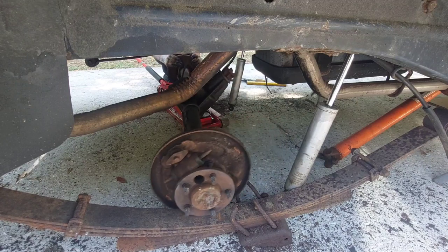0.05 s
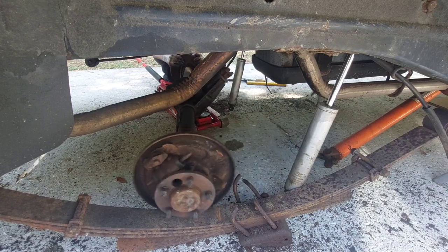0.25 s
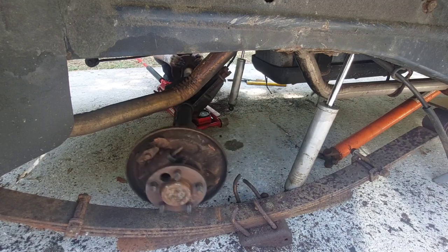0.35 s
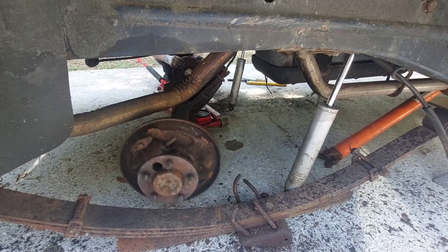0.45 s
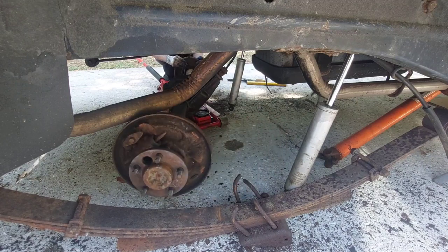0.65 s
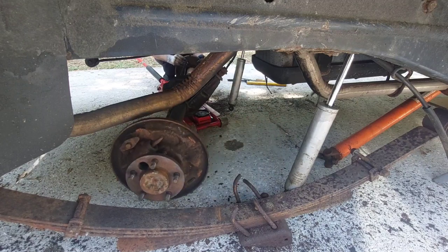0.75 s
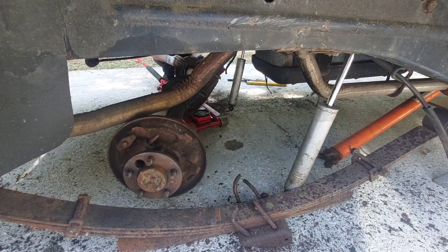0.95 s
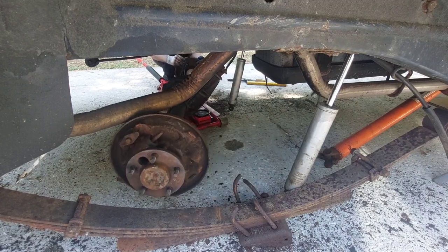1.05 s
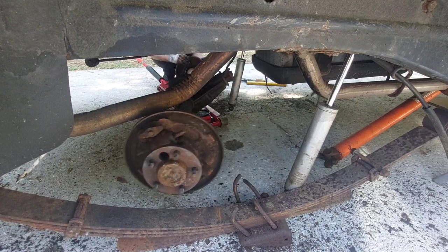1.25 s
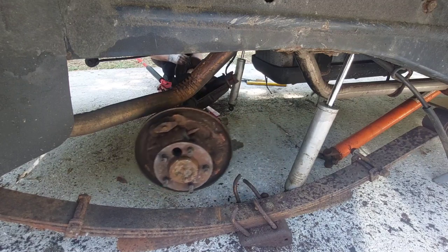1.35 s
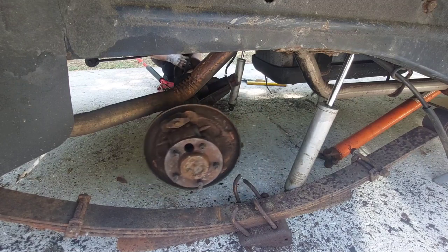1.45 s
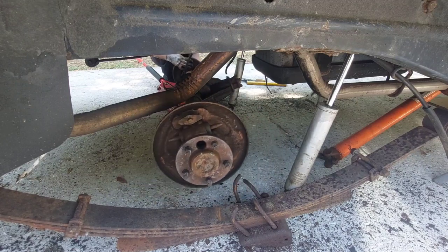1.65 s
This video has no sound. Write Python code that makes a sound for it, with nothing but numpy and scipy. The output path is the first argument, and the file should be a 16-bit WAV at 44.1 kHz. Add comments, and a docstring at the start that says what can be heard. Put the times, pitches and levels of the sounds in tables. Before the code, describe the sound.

Loose steel parts clank and rattle as a heavy axle is jolted across a concrete floor

```python
"""Slack steel parts clank as a heavy axle is shoved about on a floor jack under a car: modal blows with rebounds.
The jack's wheels grind over concrete, and shaped noise and jolts excite the axle's low body tones.
Grit scuffs as decaying puffs of coloured noise; dragged grit and light taps ring the brake drum's modes.
The clanks and scuffs reverberate in the garage, over a steady hum of shaped noise."""
import sys
import numpy as np
from scipy import signal
from scipy.fft import rfft, irfft, next_fast_len
from scipy.io import wavfile
from scipy.ndimage import uniform_filter1d

SR = 44100
rng = np.random.default_rng(int(sys.argv[2]) if len(sys.argv) > 2 else 0)


def wrap_up_sound(samples):
    """Save the sound to the file named by the first command line argument, as 16-bit audio."""
    columns = np.atleast_2d(samples).T
    # keep every value between -1 and 1, then stretch to whole-number steps
    tamed = np.clip(columns, -1, 1)
    steps = np.round(tamed * 32767).astype(np.int16)
    wavfile.write(sys.argv[1], SR, steps)


N = 74970  # length in samples

# Likeness of the two channels. Each row: frequency in Hz, left-right correlation (1 is identical).
LIKENESS = [(100, 1), (250, 0.91), (500, 0.61), (1200, -0.13), (4000, -0.032), (14000, -0.14)]
# Spectrum of slack steel's crack and weak modes. Each row: frequency in Hz, relative level in dB.
CLATTER_SPECTRUM = [(290, -42), (500, -8), (1350, -15.5), (1960, -2.5), (2130, -8), (2610, 3), (2930, -9.5),
                    (4980, -7.5), (6270, -17), (15500, -66.5)]


def amp(db):
    """The decibel is logarithmic: 20 dB is a factor of ten in amplitude."""
    return 10 ** (np.asarray(db) / 20)


def unit(x):
    """Normalization to an rms of 1."""
    return x / np.sqrt(np.mean(x ** 2) + 1e-20)


def along(points, hz):
    """Interpolation of (Hz, value) points along a logarithmic frequency axis."""
    f, v = np.transpose(points)
    return np.interp(np.log(hz + 1), np.log(f + 1), v)


def filtered(x, response):
    """Linear filtering: the spectrum of x times a complex frequency response."""
    m = next_fast_len(N + SR // 2)  # zero padding leaves room for the tail
    spectrum = rfft(x, m) * response(np.fft.rfftfreq(m, 1 / SR))
    return irfft(spectrum, m)[..., :N]


def rush(gain, grain_db=0):
    """Shaped stereo noise of rms 1: mid and side shares set its correlation, amplitude modulation its grit."""
    grain = amp(grain_db * unit(uniform_filter1d(rng.standard_normal(N), size=40)))
    noise = grain * rng.standard_normal((2, N))

    def mid_side_gain(hz):
        turn = np.arccos(np.clip(along(LIKENESS, hz), -1, 1)) / 2
        return gain(hz) * [np.cos(turn), np.sin(turn)]

    mid, side = filtered(noise, mid_side_gain)
    return unit(np.array([mid + side, mid - side]))


def swell(s, rise, t60):
    """Envelope of a damped source: exponential approach from time s, times a decay of 60 dB per t60."""
    t = np.maximum(np.arange(N) / SR - s, 0)
    return (1 - np.exp(-t / abs(rise))) * amp(-60 * t / abs(t60))


def waver(db, size, count=1):
    """Slow amplitude modulation: smoothed random gains, db in rms, drifting over about size samples."""
    drift = uniform_filter1d(rng.standard_normal((count, N)), size=size)
    drift = uniform_filter1d(drift, size=size)
    return amp(db * unit(drift))


def ports(modes):
    """Interchannel phase: each mode's phases lie further apart where the channels are less alike."""
    gap = np.arccos(np.clip(along(LIKENESS, np.transpose(modes)[0]), -1, 1))
    signed_gap = gap * rng.choice([-1, 1], size=len(gap))
    return np.outer(signed_gap, [.5, -.5]) + 2 * np.pi * rng.random((len(gap), 1))


def ring(modes, phases, rise, scale=1, tilt_db=0, length_s=0.3, scatter_db=3.0):
    """Modal superposition: one blow starts damped sines, with randomly scattered levels, in both channels."""
    hz, db, t60 = np.transpose(modes)[:, :, None]
    t = np.arange(round(length_s * SR)) / SR
    tilt = tilt_db * np.log2(hz / 3000)  # tilt in dB per octave about 3 kHz
    size = amp(db + tilt + scatter_db * rng.standard_normal(hz.shape))
    waves = np.exp(2j * np.pi * hz * t - np.log(1000) * t / abs(t60 * scale))
    onset = 1 - np.exp(-t / abs(rise))
    return onset * ((size * np.exp(1j * phases)).T @ waves).imag


def add(out, s, x):
    """Superposition: x is summed into out from time s."""
    part = out[:, round(s * SR):][:, :x.shape[1]]
    part += x[:, :part.shape[1]]


def garage_hum():
    """Stationary noise: the garage's hum is noise with a fixed spectrum."""
    # Each row: frequency in Hz, relative level in dB.
    hum_spectrum = [(18, -30.5), (30, -19), (138, -0.5), (165, -26), (303, -16), (473, -41.5), (554, -34),
                    (632, -43), (988, -33), (1350, -46.5), (16000, -53)]
    return amp(-50) * rush(lambda hz: amp(along(hum_spectrum, hz)))


def garage(x):
    """Reverberation: convolution with diffuse noise, each frequency of which decays at its own speed."""
    # Each row: frequency in Hz, t60 in seconds.
    reverb_times = [(200, .5), (2000, 0.2), (10000, 0.017)]
    hz, t, z = signal.stft(rng.standard_normal((2, SR // 2)), SR, nperseg=256)
    decay = amp(-60 * t / along(reverb_times, hz)[:, None])
    tail = signal.istft(z * decay, SR, nperseg=256)[1]
    return signal.fftconvolve(x, tail / np.linalg.norm(tail[0]), axes=1)[:, :N]


def drum():
    """Forced modal vibration: dragged grit and light taps drive drum modes, each wavering as it swings."""
    # Each row: frequency in Hz, level in dB, t60 in seconds.
    drum_modes = [(592.6, -13, .15), (815, -6.5, 0.85), (1377, -7.5, 0.19), (1450, -3, 0.77),
                  (2445, -12, 0.27), (3416, -1.5, 0.44), (3680, -5, 0.11), (3960, -1, 0.19),
                  (4030, -10.5, 0.38), (5880, -5, 0.052), (6280, -10.5, 0.26), (6775, -11, 0.1),
                  (7600, -17, 0.076), (7760, -2, 0.038)]
    # Light taps. Each row: start in seconds, level in dB, tilt in dB per octave.
    taps = [(1.191, -45.5, -2.5), (1.229, -42.5, 6)]
    # Grit dragged over the drum. Each row: start in s, level in dB, rise time constant in s, t60 in s.
    drags = [(1.142, -76.5, .015, 0.29), (1.222, -75.5, 0.0038, 0.094)]
    phases = ports(drum_modes)
    gains = waver(1.5, size=400, count=len(drum_modes))
    out = np.zeros((2, N))
    drag_level = sum(amp(db) * swell(s, rise, t60) for s, db, rise, t60 in drags)
    force = rng.standard_normal(N) * waver(6.5, size=30)[0] * drag_level
    for mode, phase, gain in zip(drum_modes, phases, gains):
        push = force.copy()
        for s, db, tilt_db in taps:
            tilt = tilt_db * np.log2(mode[0] / 3000)
            push[round(s * SR)] += amp(db + tilt + rng.normal(0, 1.17))
        answer = ring([mode], phase[None], 0.0018, length_s=.6, scatter_db=1.5)
        out += gain * signal.fftconvolve(push[None], answer, axes=1)[:, :N]
    return out


def scuffs():
    """Friction noise: puffs of grit coloured by many small resonances of the rubbed steel."""
    # Each row: start in s, level in dB, rise time constant in s, t60 in s, treble in dB, middle in dB.
    puffs = [(0.0262, -43.5, 0.0017, 0.084, -1.5, 6), (0.118, -57, .003, 0.099, 3.5, -7),
             (0.149, -50.5, 0.00116, 0.049, 0.5, -0.5), (0.193, -38.5, 0.0041, 0.45, -4.5, 3.5),
             (0.361, -50, 0.0037, 0.14, 0.5, -4), (0.394, -46.5, 0.003, 0.2, 4.5, 5),
             (0.621, -50, 0.0025, 0.15, 4, 13), (.708, -43, 0.0027, 0.086, 1, -7),
             (0.759, -47, 0.0047, 0.15, 1, 8.5), (0.789, -46, 0.0073, 0.057, -7, 11),
             (0.872, -62.5, 0.0035, 0.11, 4.5, 8), (0.972, -66.5, 0.0032, 0.078, 5.5, -1),
             (1.141, -39, .012, .31, 0, -3.5), (1.225, -37, 0.0014, .11, -0.5, -6),
             (1.415, -58.5, 0.022, 0.18, -36, 12), (1.54, -67, 0.0033, 0.23, -12.5, 6.5),
             (1.587, -60, 0.0073, 0.14, -5.5, 2), (1.613, -55.5, 0.018, 0.11, 4.5, 2)]
    # Each row: frequency in Hz, relative level in dB.
    grit_spectrum = [(350, -42), (600, 1.5), (1500, 4.5), (4000, -1.5), (7500, -6), (9000, -21),
                     (11000, -13.5), (12500, -17), (13600, -14), (15300, -16), (15900, -23)]
    split_hz, grain_db = 8000, 2
    unevenness_db, spacing_hz = 4.0, 41  # of the steel's resonances
    knots = rng.standard_normal(SR // 20)

    def colour(hz):
        metal = amp(unevenness_db * np.interp(hz / spacing_hz, np.arange(len(knots)), knots))
        return metal * amp(along(grit_spectrum, hz))

    treble = rush(lambda hz: colour(hz) / (1 + (split_hz / (hz + 1)) ** 6), grain_db)
    middle = rush(lambda hz: colour(hz) / (1 + (hz / split_hz) ** 6), grain_db)
    out = np.zeros((2, N))
    for s, db, rise, t60, treble_db, middle_db in puffs:
        balance = amp(treble_db) * treble + amp(middle_db) * middle
        out += amp(db) * swell(s, rise, t60) * balance
    return out


def body(hz):
    """Resonance: the response of axle and jack is a sum of low band-pass tones of alternating sign."""
    # Each row: frequency in Hz, bandwidth in Hz, level in dB.
    body_tones = [(80.6, 12, -8.5), (134.1, 8.9, 0.5), (190.3, 14, -9), (239.9, 10, -7.5),
                  (330.1, 16.7, -9.5), (455.3, 48.6, -19), (532, 26, -18), (627, 88, -26), (860, 57, -27),
                  (1065, 110, -30.5)]
    response = 0
    for k, (centre, width, db) in enumerate(body_tones):
        damping = 1j * hz * width
        response = response + (-1) ** k * amp(db) * damping / (centre * centre - hz * hz + damping)
    return response


def jack():
    """Forced and free vibration: wheels on concrete grind and shake the body; jolts ring one tone and push all."""
    # The shove. Each row: time in s, body level in dB, grinding level in dB, deepest tone's level in dB.
    shove = [(0.0, -42, -49.5, -67), (0.104, -45.5, -61, -45), (0.195, -49, -51, -66),
             (0.25, -27.5, -65, -45), (0.382, -38.5, -39.5, -34.5), (0.407, -32.5, -45.5, -41),
             (0.454, -29, -41, -28), (0.498, -35, -41, -32), (0.53, -25.5, -35.5, -36.5),
             (0.644, -30, -39.5, -38), (0.704, -33.5, -47, -35), (0.742, -26.5, -42, -65),
             (0.781, -33.5, -69, -52), (0.877, -39.5, -85, -40), (0.908, -43.5, -83, -42.5),
             (1.108, -55.5, -80, -56), (1.153, -46, -75.5, -45), (1.189, -40.5, -71, -50),
             (1.226, -43, -78, -40.5), (1.32, -51.5, -63, -51), (1.414, -46, -60.5, -54),
             (1.562, -53.5, -81, -67), (1.676, -56.5, -91, -51.5), (1.7, -55, -73, -62)]
    # Jolts of the load. Each row: start in s, level in dB, favoured tone in Hz, its t60 in s,
    # push on all body tones in dB.
    jolts = [(.198, -25.5, 1053, .14, -47), (.203, -33, 459, 0.22, -63), (.235, -40, 138, 0.18, -31),
             (0.268, -49, 237, 0.071, -56), (.29, -31.5, 512.7, 0.42, -49), (.402, -18, 86, 0.16, -30.5),
             (.405, -44, 6400, .25, -68), (0.441, -24, 319.4, 0.12, -42), (.445, -32, 519.5, 0.23, -57),
             (0.513, -26.5, 139.3, 0.44, -29), (0.558, -26.5, 328.8, 0.18, -40.5),
             (.62, -40, 120, 0.31, -63), (.69, -27.5, 242.4, 0.13, -37), (.77, -23, 133, 0.31, -46),
             (.786, -24.5, 2300, 0.067, -58), (.785, -23, 529, 0.19, -40), (1.142, -35, 321, 0.091, -40),
             (1.144, -33, 212.7, 0.18, -50), (1.19, -34.5, 185, 0.49, -56),
             (1.227, -28.5, 150.5, 0.21, -37), (1.26, -41, 239.7, 0.35, -51.5),
             (1.41, -35, 136, 0.41, -59.5), (1.601, -43.5, 138.1, 0.65, -56)]
    # Wheels on concrete. Each row: frequency in Hz, relative level in dB.
    grind_spectrum = [(290, -34), (500, -5.5), (1260, -23.5), (2420, -22.5), (2670, -24), (3090, -30),
                      (6450, -32), (8990, -45), (12000, -39), (15800, -47)]
    deep_hz, deep_half_width_hz = 53.8, 7
    s, body_db, grind_db, deep_db = np.transpose(shove)
    t = np.arange(N) / SR
    out = amp(np.interp(t, s, body_db)) * rush(body)
    deep = rush(lambda hz: 1 / (1 + ((hz - deep_hz) / deep_half_width_hz) ** 2))
    out += amp(np.interp(t, s, deep_db)) * deep
    grinding = rush(lambda hz: amp(along(grind_spectrum, hz)), grain_db=4)
    out += amp(np.interp(t, s, grind_db)) * grinding
    tones, push = np.zeros((2, N)), np.zeros(N)
    for s0, db, hz, t60, push_db in jolts:
        tone = [(hz, db, t60)]
        add(tones, s0, ring(tone, ports(tone), 0.0061, scatter_db=3.5))
        push[round(s0 * SR)] = amp(push_db) * SR / 60
    return out + tones * waver(1.5, size=300) + filtered(push, body)


def small_modes(count):
    """Modal density: a thicket of weak modes lies between the strong ones, the higher dying sooner on average."""
    u = rng.random((count, 2))
    hz = 500 + 9000 * u[:, 0] ** 1.4
    t60 = 0.077 * (0.75 + 0.61 * u[:, 1]) * (hz / 3000) ** -.3
    return np.transpose([hz, along(CLATTER_SPECTRUM, hz), t60])


def clanks():
    """Impact excitation: a crack, then a blow on strong and small modes and three rebounds on the strong ones."""
    # Each row: start in s, level in dB, rise time constant in s, ring time scale, tilt in dB per octave.
    blows = [(0.0263, -35.5, 0.00091, 0.31, 16.5), (0.147, -52.5, 0.0011, 0.32, -4),
             (.2013, -50, 0.0029, 0.34, -5), (.2083, -32, 0.0013, 0.2, -8), (.2347, -33, 0.0014, 0.57, 7),
             (.259, -29, 0.0016, 0.65, -2.5), (.269, -15, 0.0019, 0.61, 1), (.372, -42.5, 0.0023, .8, -5.5),
             (.3955, -38, 0.0017, 1, 3.5), (.414, -37, .002, 0.59, 4.5), (0.481, -39.5, 0.00071, 0.69, -4),
             (.5112, -10, 0.0019, 0.69, 2), (.5591, -12, 0.0017, 0.67, 2.5), (.624, -41, 0.0036, 0.64, 3.5),
             (.688, -14, 0.0018, .75, 2), (.786, -36, 0.0011, 0.55, -6)]
    # Strong modes of the slack part. Each row: frequency in Hz, level in dB, t60 in s before scaling.
    steel_modes = [(855, -9.5, 0.15), (1172, -10, 0.13), (1665, -9.5, 0.22), (2000, -22, .12),
                   (2299, -14.5, .08), (2530, 4.5, 0.052), (2609, -1, .07), (2682, -10, 0.31),
                   (2820, -15.5, 0.05), (3100, -14, 0.057), (3340, -4, 0.13), (3750, -1.5, 0.06),
                   (3905, -6, 0.1), (4263, -5, 0.15), (4937, -9.5, .08), (5006, -11.5, 0.07),
                   (5330, -8.5, .06), (5750, -12.5, 0.09)]
    rebound_s, rebound_db = 0.0054, -3  # mean spacing before jitter, level step per rebound
    loose = .008  # a rebound meets the part seated anew: rms share by which its modes shift
    crack_db, crack_t60, crack_rise_s = -10, 0.01212, .0005
    count = len(steel_modes)
    out, small = np.zeros((2, N)), small_modes(count=140)
    phases, small_phases = ports(steel_modes), ports(small)
    crack = rush(lambda hz: amp(along(CLATTER_SPECTRUM, hz)))
    for s, db, rise, scale, tilt_db in blows:
        add(out, s, amp(db - 6.5) * ring(steel_modes, phases, rise, scale, tilt_db))
        for k in (1, 2, 3):
            late = s + rebound_s * (k + rng.uniform(-0.19, 0.3015))
            shift = np.outer(rng.standard_normal(count), [loose, 0, 0])  # frequency only
            shifted = np.array(steel_modes) * (1 + shift)
            new_phases = phases + 2 * np.pi * rng.random((count, 1))
            rebound = ring(shifted, new_phases, rise, scale, tilt_db)
            add(out, late, amp(db - 12.5 + k * rebound_db) * rebound)
        clatter = ring(small, small_phases, 2 * rise, scale, tilt_db, length_s=0.033, scatter_db=1)
        add(out, s, amp(db - 8) * clatter)
        out += amp(db + crack_db) * crack * swell(s, crack_rise_s, crack_t60)
    return out


def scene():
    """Superposition of the sources; only the clanks and scuffs feed the garage's reverberation."""
    steel = clanks() + scuffs()
    reverb = amp(-12) * garage(steel)
    return steel + reverb + drum() + jack() + garage_hum()


def record(dry):
    """Band limiting: deep bass and high treble are cut, and left and right differ in level by band."""
    # Each row: frequency in Hz, level of left over right in dB.
    left_over_right = [(120, 0.5), (300, 3), (1000, -1), (2800, 0.5), (5500, 3.5), (10000, 0)]
    bass_cut_hz, fade_hz, top_hz = 48.2, 15600, 16400  # treble falls steeply at fade_hz, ends at top_hz

    def response(hz):
        side = amp(np.outer([.5, -.5], along(left_over_right, hz)))
        treble = (hz < top_hz) / (1 + (hz / fade_hz) ** 90)
        bass = 1 / (1 + (bass_cut_hz / (hz + 1)) ** 8)
        return side * treble * bass

    return filtered(dry, response)


dry = scene()
out = record(dry)
wrap_up_sound(out)
```